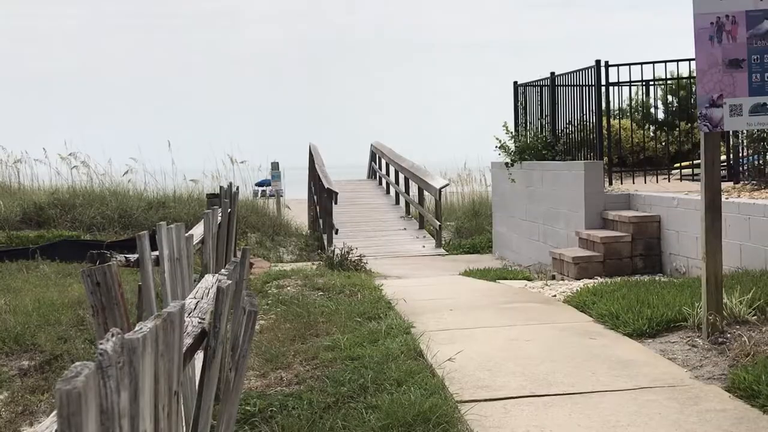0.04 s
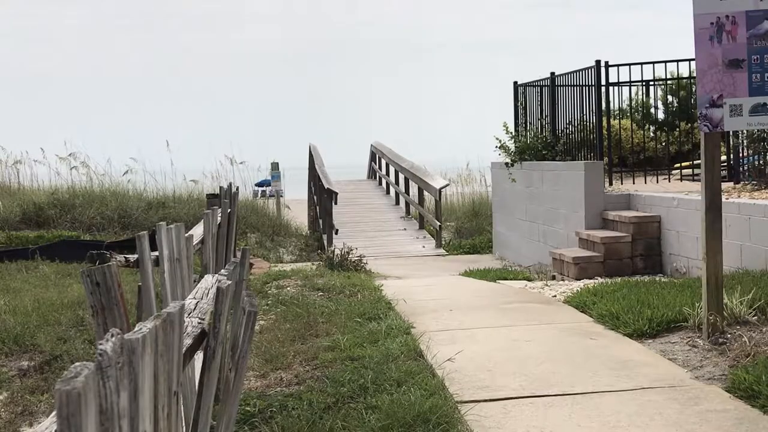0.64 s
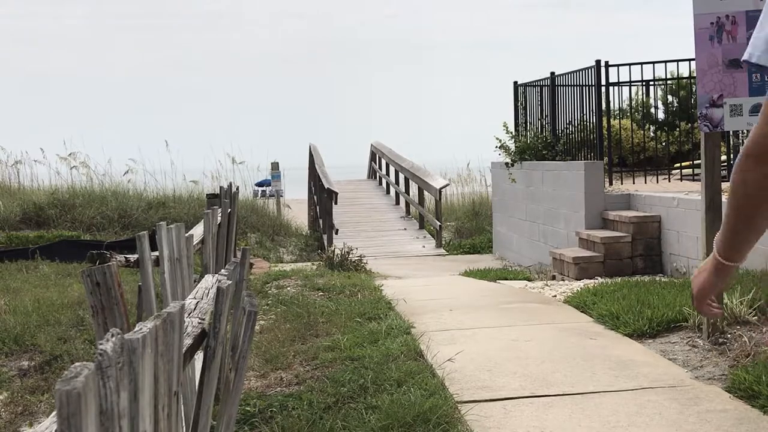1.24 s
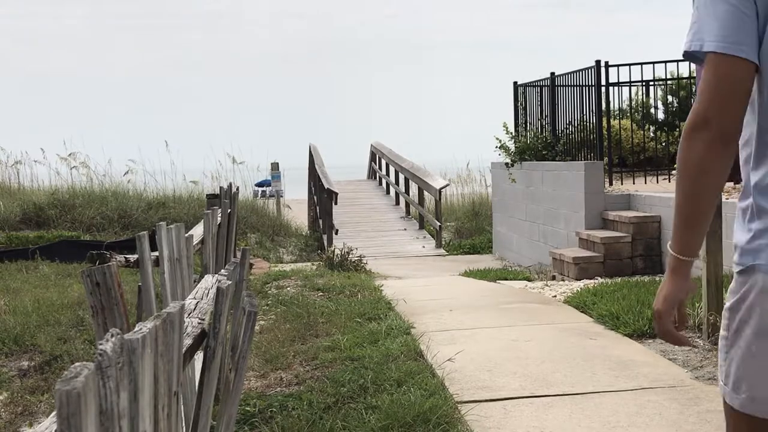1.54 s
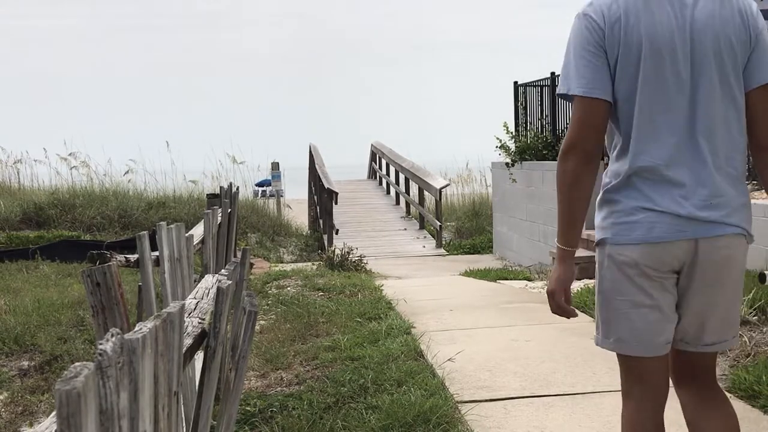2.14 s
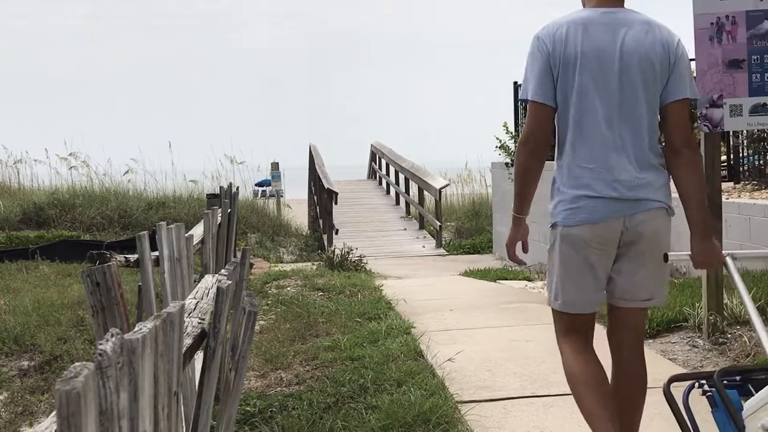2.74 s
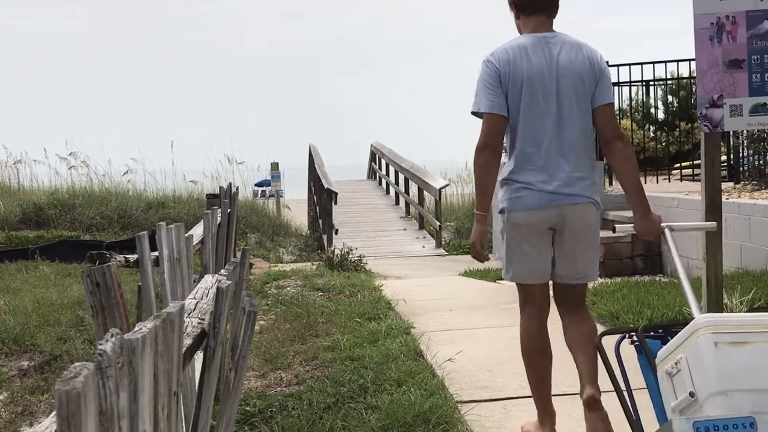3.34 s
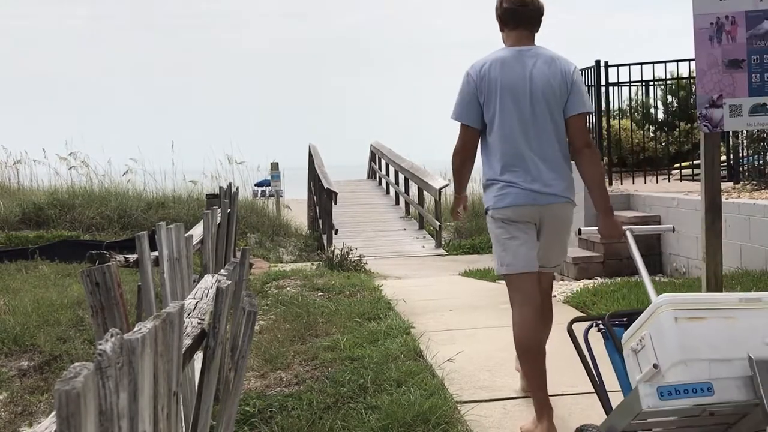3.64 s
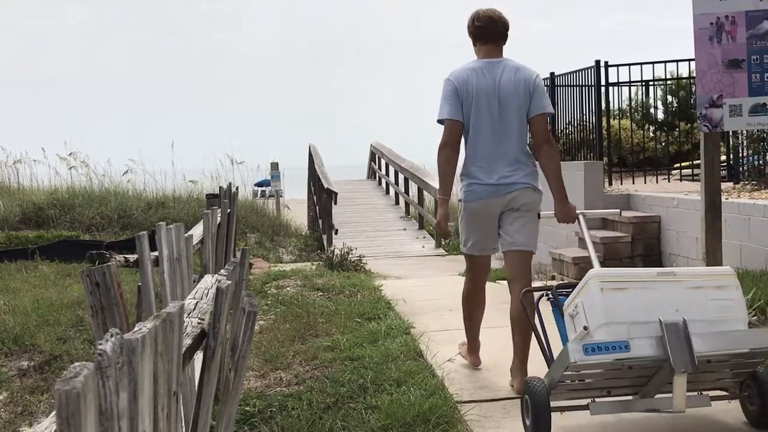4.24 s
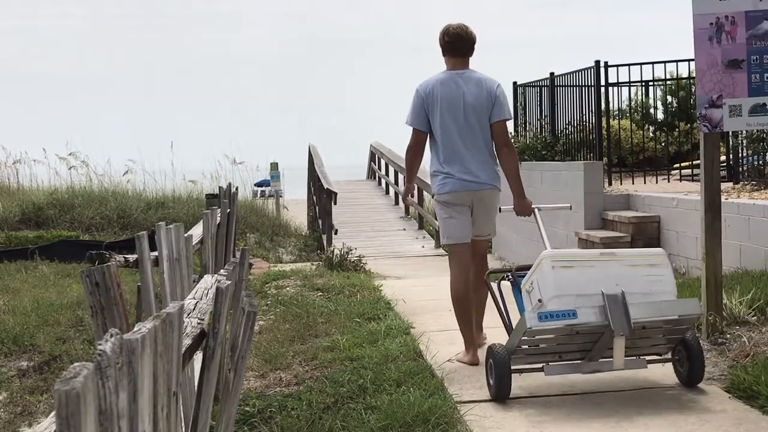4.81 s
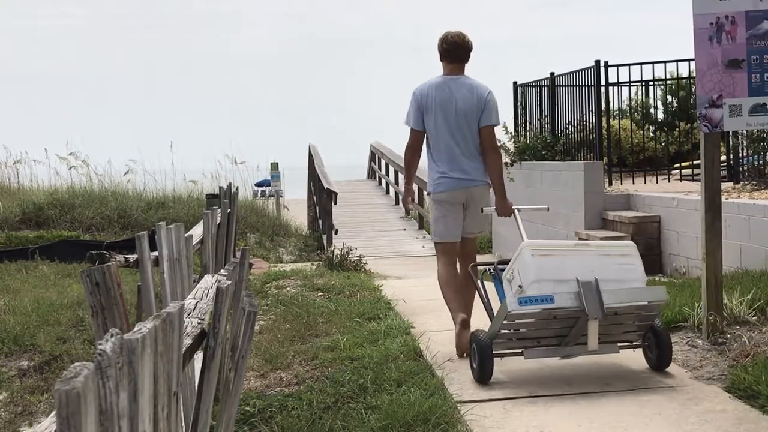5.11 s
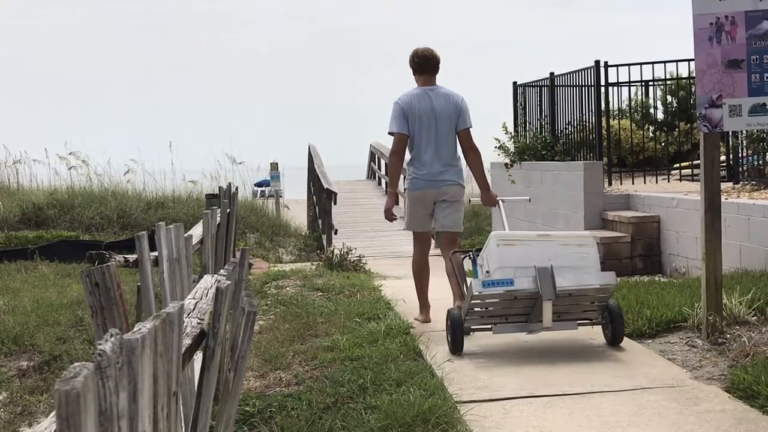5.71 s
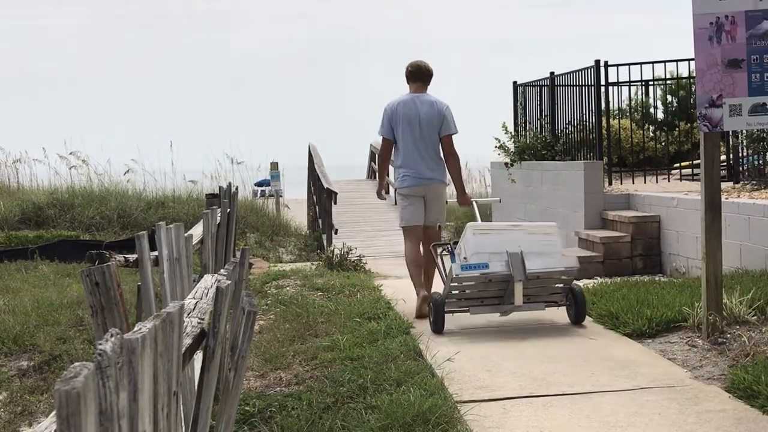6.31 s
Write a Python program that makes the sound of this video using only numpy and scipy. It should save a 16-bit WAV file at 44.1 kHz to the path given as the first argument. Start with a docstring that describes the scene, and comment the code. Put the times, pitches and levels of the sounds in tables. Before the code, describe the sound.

A metal cart carrying a cooler clanks loudly once, then rattles and rolls over gritty concrete, with faint surf behind.

```python
"""Beach cart on a concrete path

A metal hitch cart carrying a cooler is pulled past towards the beach. Rough concrete makes its tyres
roar and the hollow cooler drone; sand hisses and grit cracks under the wheels, which jolt through the
slab joints. The hitch clanks once, loudly, ringing the frame, and loose fittings knock. Bare feet
scuff alongside, and surf and a light wind rumble behind it all."""
import sys
import numpy as np
from scipy import signal
from scipy.fft import rfft, irfft, next_fast_len
from scipy.io import wavfile
from scipy.ndimage import map_coordinates

SR = 44100
rng = np.random.default_rng(int(sys.argv[2]) if len(sys.argv) > 2 else 0)


def wav_out(sig):
    """Save sig, one row per channel (or a flat mono array), as 16-bit PCM at SR to the path in sys.argv[1]."""
    wavfile.write(sys.argv[1], SR, np.round(np.clip(np.atleast_2d(sig).T, -1, 1) * 32767).astype(np.int16))


N = 289296
TIME_S = np.arange(N) / SR

# Levels in all tables are relative; t60_s is the time to die away by 60 dB.
# ring of the loose fittings: pitch_hz, level_db, t60_s
FITTING_MODES = [(840, -1, .13), (1020, -6, .1), (1210, 0, .1), (1400, 0, .13), (1740, -3, .09),
                 (1950, -3, .08), (2120, -5, .12), (2330, -6, .08), (2820, -7, .05), (3550, -11, .045)]
# low thump of tyre and cooler: pitch_hz, level_db, t60_s
THUMP_MODES = [(72, -28, 0.52), (91.8, -2, 0.3), (132.4, -2.5, 0.33), (186.8, -0.5, 0.4), (224.7, -6.5, .2),
               (308, -8, 0.16), (393.5, -7.5, 0.23)]
# bright crack of one grain: frequency_hz, level_db, t60_s
CRACK_BANDS = [(2980, -11.5, 0.013), (4800, -3.5, 0.0029), (6000, 4.5, 0.0032), (9350, 2.5, 0.0035),
               (10500, -11, 0.0047), (11300, 2.5, 0.0022), (15400, -3, 0.0017)]


def amp(db):
    """Decibels to gain."""
    return 10 ** (np.asarray(db) / 20)


def unit(x):
    """Scale to rms 1."""
    return x / np.sqrt(np.mean(x ** 2) + 1e-20)


def along(points, hz):
    """Interpolate (frequency_hz, value) points on a log frequency axis."""
    point_hz, values = np.transpose(points)[:2]
    return np.interp(np.log(hz + 1), np.log(point_hz + 1), values)


def wobble(rate_hz):
    """A smooth random curve through rate_hz points a second."""
    knots = rng.standard_normal(int(N * rate_hz / SR) + 4)
    return map_coordinates(knots, [TIME_S * rate_hz], mode="nearest")


def swell(at_s, width_s):
    """A smooth bump of height 1 around a moment."""
    return 1 / (1 + ((TIME_S - at_s) / width_s) ** 2)


def filtered(x, response):
    """Filter x by a gain given as a function of frequency."""
    size = next_fast_len(len(x) + SR // 8)
    return irfft(rfft(x, size) * response(np.fft.rfftfreq(size, 1 / SR)), size)[:len(x)]


def coloured(x, spectrum):
    """Shape x with a (frequency_hz, level_db) curve, at rms 1."""
    return unit(filtered(x, lambda hz: amp(along(spectrum, hz))))


def resonate(x, peaks):
    """Play x through (pitch_hz, width_hz, level_db) resonances of alternating polarity, at rms 1."""
    def body(hz):
        return sum((-1) ** k * amp(db) * 1j * hz * width / (pitch ** 2 - hz ** 2 + 1j * hz * width)
                   for k, (pitch, width, db) in enumerate(peaks))
    return unit(filtered(x, body))


def add(track, start_s, sound):
    """Mix a sound into the track."""
    part = track[round(start_s * SR):][:len(sound)]
    part += sound[:len(part)]


def burst(bands, attack_s, tilt_db=0, stretch=1, knee_hz=16000):
    """A noise hit whose bands die at their own speeds, tilted by tilt_db per decade up to the knee."""
    size = SR // 2
    t, hz = np.arange(size) / SR, np.fft.rfftfreq(size, 1 / SR)
    centres, _, t60 = np.transpose(bands)
    gain = unit(amp(along(bands, hz) + tilt_db * np.log10(np.clip(hz, centres[0], knee_hz))))
    shares = np.array([along(np.c_[centres, one], hz) for one in np.eye(len(bands))])
    band_noise = irfft(rfft(rng.standard_normal(size)) * gain * shares, size)
    decay = amp(-60 * t / (stretch * t60[:, None]))
    return np.sum(band_noise * decay, axis=0) * (1 - np.exp(-t / attack_s))


def ring(modes, scatter_db, attack_s, length_s, blur_hz):
    """Damped modes whose strengths scatter from blow to blow; rattling parts make their phases wander."""
    t = np.arange(int(length_s * SR)) / SR
    hz, db, t60 = np.transpose(modes)[:, :, None]
    gain = amp(db + scatter_db * rng.standard_normal(hz.shape))
    wander = np.cumsum(rng.standard_normal((len(hz), len(t))), axis=1) * np.sqrt(2 * np.pi * blur_hz / SR)
    phase = 2 * np.pi * (hz * t + rng.random(hz.shape)) + wander
    partials = gain * np.sin(phase) * amp(-60 * t / t60)
    return partials.sum(axis=0) * (1 - np.exp(-t / attack_s))


def grains(per_s, spread_db):
    """Tiny contacts of random size at random moments, at rms 1."""
    sizes = amp(spread_db * np.clip(rng.standard_normal(N), -2, 2)) * rng.choice([-1, 1], N)
    return unit(sizes * (rng.random(N) < per_s / SR))


def shore():
    """Surf and light wind lay down a low, restless rumble that slowly freshens, with one lull."""
    # the rumble's colour: frequency_hz, level_db
    surf_spectrum = [(20, -43), (35, -9), (55, -1.5), (85, 0.5), (130, -5.5), (190, -7.5), (270, -16),
                     (450, -23.5), (1200, -28), (4000, -38.5), (15000, -71)]
    freshening_db = 0.42 * (TIME_S - N / SR / 2)
    lull_db = -2.5 * swell(at_s=4.13, width_s=0.58)
    level_db = -49 + freshening_db + lull_db + 0.91 * wobble(8.5)
    return amp(level_db) * coloured(rng.standard_normal(N), surf_spectrum)


def wall_reflections(sound):
    """Walls and fences answer with a short, faint tail."""
    # the reflected tail: frequency_hz, level_db, t60_s
    tail_bands = [(150, -17, 0.41), (1510, -4, 0.22), (6160, -10.5, 0.21), (15000, -14, 0.26)]
    tail = burst(tail_bands, attack_s=0.013)
    return amp(-16.5) * signal.fftconvolve(sound, tail / np.linalg.norm(tail))[:N]


def feet():
    """Bare soles brush over the sandy concrete."""
    # foot scuffs: start_s, level_db
    scuffs = [(0.4982, -48), (0.534, -48), (2.4444, -45.5), (3.009, -45), (3.9513, -41), (4.6534, -41.5),
              (4.923, -35.5), (4.948, -40)]
    # rasp of a sole: frequency_hz, level_db, t60_s
    rasp_bands = [(800, 1, 0.24), (3020, 9, 0.068), (5550, 0.5, 0.11), (8300, 2, 0.067),
                  (14900, -11.5, 0.14)]
    out = np.zeros(N)
    for start_s, db in scuffs:
        add(out, start_s, amp(db - 6) * burst(rasp_bands, attack_s=0.0016))
    return out


def tail_on(turn_at_s=5.2, ease_s=0.24):
    """0 while the cart is side-on, 1 once it has turned away."""
    return 0.5 + 0.5 * np.tanh((TIME_S - turn_at_s) / ease_s)


def sand_level_db():
    """Sand hiss fills in as the cart nears, swells in a loose patch and gains a little from behind."""
    distance_db = -2 * np.exp(-TIME_S / 0.42)
    loose_patch_db = 7 * swell(at_s=2.07, width_s=0.17)
    return -66.5 + distance_db + loose_patch_db + 2 * tail_on()


def sand_crackle():
    """Fine sand crackles in faint clumps, more so where more of it lies."""
    ticks = coloured(grains(per_s=170, spread_db=5), CRACK_BANDS)
    clumps_db = 3.5 * wobble(18)
    return amp(sand_level_db() - 9 + clumps_db) * ticks


def rolling():
    """Rough concrete peppers the tyres, bounces the cart, shakes the cooler and crunches with sand."""
    # tread roar as the cart comes round into the open: time_s, level_db
    tread_fader = [(0, -66.5), (1.2, -60.5), (3.1, -59.5), (3.5, -54.5), (4.5, -50), (5.85, -46),
                   (6.56, -49.5)]
    # tread heard from the side: frequency_hz, level_db
    side_spectrum = [(200, -4), (450, -3), (700, 0.5), (1050, 5), (1750, 5), (2200, -2.5), (2800, -8.5),
                     (4000, -15.5), (5000, -29), (9000, -50)]
    # tread heard from behind: frequency_hz, level_db
    back_spectrum = [(200, -13), (450, -7.5), (800, -5.5), (1050, -1.5), (1600, -8.5), (2200, -12.5),
                     (2750, -19), (3200, -14.5), (4300, -21), (5000, -29), (9000, -57)]
    # wheel hubs singing along with the tread: pitch_hz, width_hz, level_db
    hub_peaks = [(1026, 53, 5), (1220, 69, -9), (1690, 180, -7), (3250, 254, -15)]
    # the cooler's hollow body: pitch_hz, width_hz, level_db
    cooler_peaks = [(172.6, 32, -1), (223, 41, -1.5), (264, 21, 2), (322.2, 24.7, 0.36), (401, 48, -5.5)]
    # sand hissing under the tyres: frequency_hz, level_db
    sand_spectrum = [(1500, 9.5), (3500, 2.5), (5000, 2), (6300, 3.5), (9400, -1), (10500, -4), (12500, -5),
                     (15500, -11)]
    turned = tail_on()
    behind = 0.19 + 0.68 * turned  # share of the tread heard from behind
    load = wobble(17)  # the weight on the wheels keeps shifting

    side = coloured(grains(per_s=3000, spread_db=3.5), side_spectrum)
    back = coloured(grains(per_s=4000, spread_db=0.5), back_spectrum)
    hubs = amp(-9.5) * resonate(grains(per_s=2500, spread_db=3.5), hub_peaks)
    tread = np.sqrt(1 - behind) * side + np.sqrt(behind) * (back + hubs)
    tread_db = np.interp(TIME_S, *np.transpose(tread_fader)) - 3.5 + 0.38 * load

    shaking = grains(per_s=650, spread_db=1)
    drone = resonate(resonate(shaking, cooler_peaks), cooler_peaks)  # twice, for steep flanks
    drone_db = -64.5 + 2 * TIME_S + 4 * turned + 1.1 * load

    bounce = resonate(grains(per_s=1700, spread_db=6.5), [(127.3, 11.5, 0)])
    bounce *= np.sqrt(swell(at_s=1.6, width_s=1.1))  # the tyres boom most around the hitch's blow

    crunch = rng.standard_normal(N) + amp(-4) * grains(per_s=450, spread_db=7)
    sand = amp(sand_level_db() + 0.3 * load) * coloured(crunch, sand_spectrum)
    return amp(tread_db) * tread + amp(drone_db) * drone + amp(-51) * bounce + sand


def grit():
    """Single grains begin to give under the tyres, crack, and scatter their crumbs."""
    # the largest grains bursting: time_s, level_db, tilt_db_per_decade
    big_grains = [(1.463, -42.5, 14), (2.4062, -42, 0), (2.4952, -36.5, 8), (2.7957, -37.5, 9),
                  (3.2953, -33, 13), (3.6177, -40.5, -5), (3.6572, -39.5, 9), (3.8243, -40, -1),
                  (3.8584, -29, 6), (4.0598, -28.5, 8), (4.2194, -44, 5), (4.261, -40, 9), (4.424, -41, 3),
                  (4.502, -40.5, -7), (4.734, -36.5, -12), (4.8646, -28.5, 0), (5.1447, -35, 9),
                  (5.5747, -36.5, 0), (5.617, -37.5, 2), (5.9656, -42, 6), (6.0372, -38, -2),
                  (6.322, -34.5, 4), (6.44, -40.5, -6)]
    give_s, crumble_s = 0.021, 0.11  # the crumbs rise and fall by 60 dB in these times
    small_per_s = 2.5
    crumbs = rng.standard_normal(N) + grains(per_s=1200, spread_db=6)
    draws = rng.random((round(small_per_s * N / SR), 2))
    small_grains = [(when * N / SR, -53.5 + 14 * size, 4) for when, size in draws]
    cracks, crumbling = np.zeros(N), np.zeros(N)
    for time_s, db, tilt_db in list(big_grains) + small_grains:
        add(cracks, time_s + 0.00087, amp(db + 4) * burst(CRACK_BANDS, attack_s=0.0001, tilt_db=tilt_db))
        near = abs(TIME_S - time_s) < 0.15
        since_s = TIME_S[near] - time_s
        fade_db = -60 * np.maximum(since_s / crumble_s, -since_s / give_s)
        crumbling[near] += amp(db - 18.5 + fade_db)
    return cracks + crumbling * coloured(crumbs, CRACK_BANDS)


def snaps():
    """Stiff parts of the cart snap as the load shifts."""
    # sharp snaps: start_s, level_db, decay_factor
    hits = [(0.4767, -33, 1), (.485, -47, 0.54), (0.7782, -28.5, 0.25)]
    # colour of a snap: frequency_hz, level_db, t60_s
    snap_bands = [(605, -23, 0.045), (1930, 6.5, 0.036), (3280, -4.5, 0.072), (5300, 6, 0.05),
                  (8500, 2, 0.017), (10500, -6, 0.039), (15500, -15, 0.038)]
    out = np.zeros(N)
    for start_s, db, stretch in hits:
        add(out, start_s, amp(db) * burst(snap_bands, attack_s=0.00029, stretch=stretch))
    return out


def fittings():
    """Loose parts knock with a dull clack and a short, damped ring."""
    # knocks in the frame: start_s, level_db, tilt_db_per_decade
    knocks = [(0.69, -39.5, -14), (1.044, -38.5, -4), (1.262, -39, 5), (1.280, -41.5, 8), (1.380, -38, 10),
              (1.955, -31, 0), (2.294, -31.5, -1), (2.523, -33.5, -7), (2.624, -34, 4), (2.665, -34, 4)]
    # dull clack of a knock: frequency_hz, level_db, t60_s
    clack_bands = [(484, -6, 0.081), (885, -3.5, 0.25), (2020, -1, 0.12), (3320, -9.5, 0.085),
                   (4300, -18.5, 0.13), (6200, -22, 0.11), (12000, -37, 0.097)]
    out = np.zeros(N)
    for start_s, db, tilt_db in knocks:
        metal = ring(FITTING_MODES, scatter_db=2, attack_s=0.001, length_s=0.25, blur_hz=8)
        add(out, start_s, amp(db - 13) * metal)
        add(out, start_s, amp(db - 8) * burst(clack_bands, attack_s=0.00093, tilt_db=tilt_db))
    return out


def slab_joints():
    """Each jolt bounces the load; every contact clatters, thumps tyre and cooler and rings the fittings."""
    # a wheel drops into a joint or climbs out:
    # start_s, clatter_db, tilt_db_per_decade, thump_db, loss_per_rebound_db (negative builds up)
    jolts = [(1.599, -35, 2.5, -30, 2.5), (1.668, -32, 10, -26.5, -2), (3.249, -37.5, 2, -38, 12),
             (3.273, -34, -1, -36.5, 4), (3.349, -36, 7, -37, 11.5), (5.0082, -39.5, 2, -30, 19),
             (5.039, -37.5, -1.5, -37, 15)]
    # clatter of the load: frequency_hz, level_db, t60_s
    clatter_bands = [(250, -17, 0.07), (400, 0.5, 0.052), (600, 4.5, 0.1), (900, 8.5, 0.046),
                     (1400, -1.5, 0.21), (2200, -2.5, 0.15), (4180, -5.5, 0.063), (6560, -13.5, 0.092),
                     (8460, -19, 0.12), (15500, -22, 0.07)]
    contacts, rebound_s = 3, 0.022
    out = np.zeros(N)
    for start_s, clatter_db, tilt_db, thump_db, loss_db in jolts:
        for k in range(contacts):
            contact_s, force = start_s + k * rebound_s, amp(-k * loss_db)
            clatter = burst(clatter_bands, attack_s=0.002, tilt_db=tilt_db, knee_hz=5500)
            thump = ring(THUMP_MODES, scatter_db=0, attack_s=0.0058, length_s=0.5, blur_hz=7.8)
            metal = ring(FITTING_MODES, scatter_db=0, attack_s=0.0016, length_s=0.25, blur_hz=2.4)
            add(out, contact_s, force * amp(clatter_db) * clatter)
            add(out, contact_s, force * amp(thump_db - 5) * thump)
            add(out, contact_s, force * amp(clatter_db - 12) * metal)
    return out


def hitch():
    """The hitch touches, thumping the cooler, then slams and chatters, leaving the frame ringing."""
    # first touch, main slam and rebounds: start_s, level_db
    blows = [(1.712, -31), (1.7247, -10.5), (1.727, -13), (1.728, -19), (1.797, -47)]
    # dense crash of a blow: frequency_hz, level_db, t60_s
    crash_bands = [(70, -20, 0.67), (199, 6, 0.14), (410, -9.5, 0.47), (650, -20, 0.46), (1510, -11, 0.29),
                   (2880, 0.5, 0.065), (4100, -0.5, 0.04), (6300, -4, 0.062), (9050, -9.5, 0.076),
                   (10800, -16, 0.092), (15500, -23, 0.11)]
    # ring of the metal frame: pitch_hz, level_db, t60_s
    frame_modes = [(129, -26.5, .68), (189, -24, .3), (226, -24.5, .36), (324, -39, .33), (396, -34, .42),
                   (596, -32, .3), (967, -24, .18), (1346, -46, .4), (1593, -28, .26), (1643, -31.5, .6),
                   (1707, -42, .5), (1768, -30, .26), (1976, -27, .56), (2105, -45, .8), (2281, -35, .27),
                   (2324, -33, .37), (2697, -30, .36), (2821, -29, .13), (3083, -28, .17), (3876, -32, .13),
                   (4495, -33, .15), (5141, -37, .17), (5491, -36, .15), (5776, -32, .16), (6500, -34, .11),
                   (8317, -34, .1), (9168, -29, .11), (9770, -39, .25), (12320, -49, .27)]
    touch_s, slam_s = blows[0][0], blows[1][0]
    out = np.zeros(N)
    for start_s, db in blows:
        add(out, start_s, amp(db - 4) * burst(crash_bands, attack_s=0.000078))
    thump = ring(THUMP_MODES, scatter_db=2.5, attack_s=0.0065, length_s=0.5, blur_hz=3.7)
    add(out, touch_s, amp(-29) * thump)
    add(out, slam_s, ring(frame_modes, scatter_db=0.5, attack_s=0.001, length_s=1, blur_hz=0.8))
    return out


def scene():
    """Impacts and their faint reflections over the rolling cart and the shore, in mono."""
    impacts = hitch() + fittings() + slab_joints() + grit() + sand_crackle() + snaps() + feet()
    return (impacts + wall_reflections(impacts) + rolling() + shore())[None]


def record(dry):
    """A small microphone loses the deepest bass, and the very top is cut off."""
    low_cut_hz, top_hz = 45, 16100
    thin = signal.sosfilt(signal.butter(2, low_cut_hz, "highpass", fs=SR, output="sos"), dry)
    return np.array([filtered(channel, lambda hz: hz < top_hz) for channel in thin])


dry = scene()
out = record(dry)
wav_out(out)
```